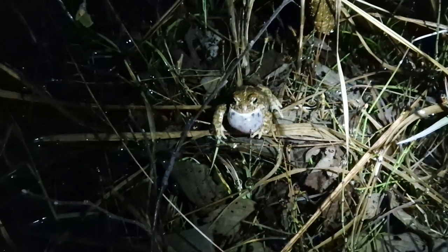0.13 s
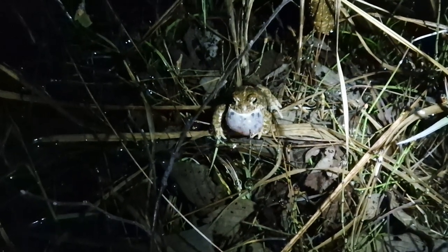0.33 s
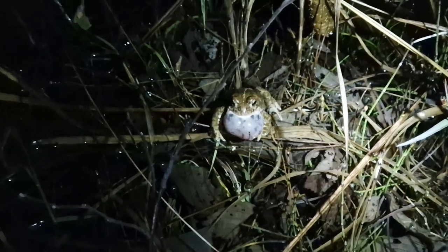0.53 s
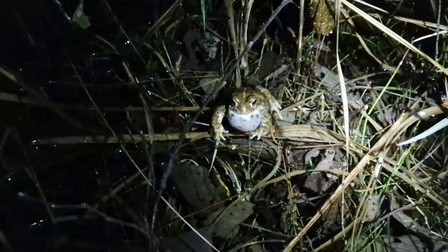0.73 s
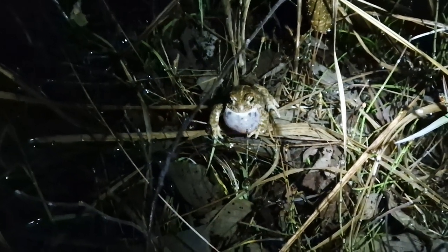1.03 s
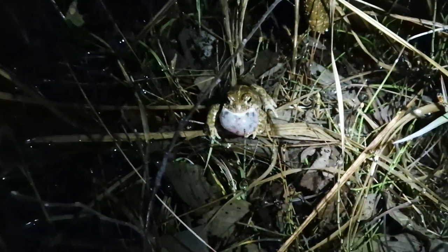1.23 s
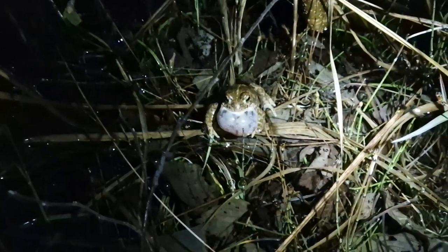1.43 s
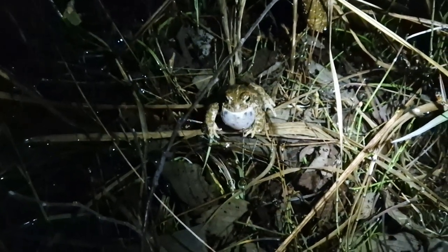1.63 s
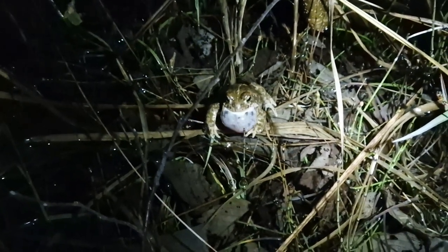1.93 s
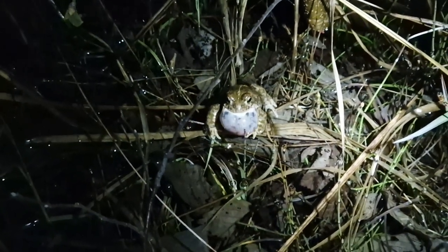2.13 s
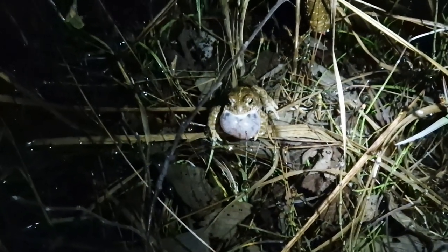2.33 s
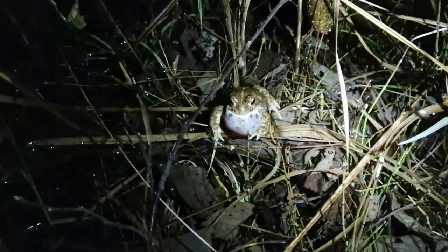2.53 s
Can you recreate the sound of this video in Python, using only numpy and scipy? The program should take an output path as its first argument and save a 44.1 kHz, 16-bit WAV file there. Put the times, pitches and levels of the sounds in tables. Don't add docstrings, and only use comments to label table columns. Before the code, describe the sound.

Loud rattling toad calls in three bursts, with a weaker neighbour and distant toad chorus

```python
import sys
import numpy as np
from scipy import signal
from scipy.fft import rfft, irfft, next_fast_len
from scipy.io import wavfile

SR = 44100
rng = np.random.default_rng(int(sys.argv[2]) if len(sys.argv) > 2 else 0)


def transcribe(u):
    v = np.clip(np.atleast_2d(u).T, -1, 1)
    q = np.round(v * 32767).astype(np.int16)
    wavfile.write(sys.argv[1], SR, q)


def convert_level_to_amplitude(level_db):
    exponent = np.asarray(level_db, float) / 20
    return 10 ** exponent


N = 119070


def decay(hz, t60_s):
    return 2j * np.pi * hz - np.log(1000) / t60_s


def pair(t, a, b):
    y = (np.exp(a * t) - np.exp(b * t)) / (a - b)
    return y / np.abs(y).max(axis=1, keepdims=True)


def onset(t, rise_s):
    return 1 - np.exp(-t / rise_s)


def filtered(x, order, hz, kind):
    return signal.sosfilt(signal.butter(order, hz, kind, fs=SR, output="sos"), x)


def place(times_s, way, shape, size=1500):
    left_db, right_db, late_ms = way
    out = np.zeros(next_fast_len(N + 4000))
    first = np.floor(times_s * SR).astype(int)
    i = np.arange(size)
    t = np.maximum((i + (first - times_s * SR)[:, None]) / SR, 0)
    fade = np.minimum((size - i) / 300, 1)
    np.add.at(out, first[:, None] + i, shape(t) * fade)
    hz = np.arange(len(out) // 2 + 1) * SR / len(out)
    late = np.exp(-2j * np.pi * hz * late_ms / 1000)
    right = irfft(rfft(out) * late, len(out))
    return np.array([convert_level_to_amplitude(left_db) * out[:N], convert_level_to_amplitude(right_db) * right[:N]])


STRIKE = rng.standard_normal((400, 14)).T


def overtones(t, hz, db, t60_s):
    total = 0
    for f, d, s, z in zip(hz, db, t60_s, STRIKE[:, :len(t), None]):
        total = total + convert_level_to_amplitude(d + 1.5 * z) * np.exp(decay(f, s) * t + 1j * z * f / 4000)
    return -total * onset(t, 0.0011) ** 2


# start_s, level_db
GUSTS = [(0, -76.5), (1.68, -77), (1.76, -61), (1.84, -70.5), (1.94, -62), (2.05, -68.5), (2.21, -48),
         (2.4, -62), (2.48, -77), (2.62, -61.5), (2.7, -71)]


def night():
    z = rng.standard_normal((4, N))
    side = np.array([[1], [-1]])
    rumble = filtered(z[0] + 0.3 * z[1] * side, 3, [28, 68], "bandpass")
    start_s, level_db = np.array(GUSTS).T
    gusts = convert_level_to_amplitude(np.interp(np.arange(N) / SR, start_s, level_db))
    hiss = signal.lfilter([1], [1, -.93], z[2:])
    both = rumble / rumble.std() * gusts + hiss / hiss.std() * convert_level_to_amplitude(-81)
    return both * convert_level_to_amplitude(1.5 * side)


def chorus():
    calls_per_s, level_db, centre_hz = 130, -55.5, 1601
    z = rng.random((int(calls_per_s * N / SR), 3))
    total = np.zeros((2, N))

    def ring(t, hz, t60_s):
        return pair(t, decay(hz, t60_s), decay(1.02 * hz, 0.8 * t60_s)).real

    for k, pan_db in enumerate((2.5, -2.5)):
        when, pitch, loud = z[k::2].T
        f = centre_hz * (1 + 0.24 * (pitch[:, None] - .5))
        db = level_db + 14 * (loud[:, None] - .5)

        def click(t):
            y = ring(t, f, 0.03)
            y = y + convert_level_to_amplitude(-22) * ring(t, 2.4 * f, .02)
            y = y + convert_level_to_amplitude(-23.5) * ring(t, 2.35 * f, 0.018)
            return convert_level_to_amplitude(db) * y

        total += place(when * N / SR, (pan_db, -pan_db, -pan_db / 12), click, size=900)
    return total


# pitch_hz (for a 1717 Hz voice), level_db, t60_s
FAR_BODY = [(1000, -54.5, 0.016), (2150, -24, 0.0065), (3050, -28.5, 0.022), (3590, -19.5, 0.02),
            (4044, -19, .009), (4860, -47, 0.038), (9000, -46, 0.018)]


def far_toad(clicks, hz, t60_s, way, spread, bright_db):
    start_s, level_db = np.array(clicks).T
    f = hz * (1 + spread * rng.standard_normal((len(start_s), 1)))
    body_hz, body_db, body_t60_s = np.array(FAR_BODY).T

    def click(t):
        y = pair(t, decay(f, t60_s), decay(1.007 * f, 0.0084)) * onset(t, 0.00049) ** 2
        y = y + overtones(t, body_hz * hz / 1717, body_db + bright_db, body_t60_s)
        return convert_level_to_amplitude(level_db)[:, None] * y.real

    return place(np.maximum(start_s - .0005, 0), way, click)


# start_s, level_db
DEEP = [(0.0, -36.5), (0.0248, -37), (0.0485, -34.5), (0.0614, -44), (0.0745, -34), (0.1002, -33.5),
        (0.1188, -49), (0.1245, -32.5), (0.3035, -31), (0.3413, -39), (0.383, -47), (0.408, -41.5),
        (0.4147, -31.5), (0.6097, -39), (0.6528, -39.5), (0.7882, -32.5), (0.8589, -34.5),
        (0.9994, -34.5), (1.0283, -35), (1.0527, -37), (1.0827, -35), (1.1691, -38), (1.2007, -34),
        (1.2634, -48), (1.2868, -37.5), (1.4155, -35.5), (1.469, -50.5), (1.6705, -34), (1.7156, -34),
             (1.766, -37.3), (1.7867, -34.5), (1.802, -34.5), (1.8556, -38), (1.9074, -34), (1.976, -47),
             (2.0152, -28.5), (2.0868, -32.5), (2.1311, -38), (2.2406, -45.5), (2.3544, -45), (2.4684, -32),
             (2.535, -41.5), (2.556, -37), (2.5936, -33.5), (2.6172, -34), (2.6458, -34)]


def deep_toad():
    clicks = np.array(DEEP)
    return far_toad(clicks, 1507.4, 0.032, (1, -1.7, -.05), spread=0.005, bright_db=-2)


# start_s, level_db
CALL_1 = [(0.1341, -6.5), (0.1503, -3.5), (0.1655, -5), (0.1822, -4), (0.2022, -5.0), (0.2333, -7),
          (0.2584, -4), (0.2822, -5), (0.3145, -5), (0.3484, -4), (0.3672, -3.5), (0.3894, -3),
          (0.4205, -5), (0.45, -2), (0.4676, -2), (0.4872, -3), (0.5126, -4.5), (0.5422, -3),
          (0.5638, -3.5), (0.5922, -4.5)]
CALL_2 = [(0.8919, -5.5), (0.9088, -5.5), (0.927, -5), (0.9489, -5.5), (0.984, -8), (1.015, -4.5),
          (1.0362, -5), (1.0638, -5), (1.1037, -5.5), (1.1288, -4), (1.155, -4.5), (1.1894, -6),
          (1.2231, -3.5), (1.2486, -3.5), (1.271, -3.5), (1.299, -4), (1.3274, -3.5), (1.3498, -3),
          (1.374, -4.0), (1.3988, -3), (1.4307, -5), (1.4554, -3.5), (1.488, -5)]
CALL_3 = [(1.8083, -5.5), (1.8248, -5), (1.8427, -5.5), (1.865, -6), (1.8968, -6), (1.9364, -4),
          (1.962, -4.5), (1.9891, -4), (2.0207, -6.5), (2.046, -3.5), (2.0674, -4.5), (2.0963, -4.9),
          (2.1432, -4.5), (2.1704, -4.3), (2.199, -3.5), (2.224, -3.5), (2.2546, -4.2), (2.2861, -4),
          (2.3151, -4), (2.3393, -2.5), (2.3649, -4.0), (2.3903, -3.5), (2.4197, -4), (2.4462, -4)]
# slack_hz, tight_hz, slack_db, tight_db, t60_s
BODY = [(516, 610, -42.5, -43, .015), (858, 860, -36, -36.5, .017), (1180, 1500, -37, -36, 0.004),
        (2090, 2250, -25.5, -27.5, 0.039), (2720, 2830, -37, -34.5, 0.018), (3190, 3420, -28, -23.5, .014),
        (3930, 3850, -37, -41.5, 0.026), (4770, 5250, -47, -34.5, 0.021), (6380, 6350, -29.5, -29, 0.012),
        (8700, 10000, -70.5, -57, 0.012), (11400, 9400, -63.5, -42, 0.015),
        (12900, 11450, -72.5, -47.5, 0.025), (16000, 15500, -89, -42, .02),
        (15300, 14350, -110, -43, 0.022)]


def near_toad():
    calls = [np.array(c) for c in (CALL_1, CALL_2, CALL_3)]
    start_s, level_db = np.vstack(calls).T
    into_call_s = np.concatenate([c[:, 0] - c[0, 0] for c in calls])[:, None]
    tight = np.clip(into_call_s / 0.62, 0, 1.2) ** 0.77

    def mix(slack, tense):
        return slack + (tense - slack) * tight

    sac = decay(mix(1645, 1870.6), mix(0.016, 0.024))
    throat = decay(mix(1675, 1670), 0.014)
    belly = decay(1514.6, .04)
    body_hz, body_db, body_t60_s = [], [], []
    for slack_hz, tight_hz, slack_db, tight_db, t60_s in BODY:
        full = 0.52 if slack_hz < 14000 else 1
        body_hz.append(mix(slack_hz, tight_hz))
        body_db.append(slack_db + (tight_db - slack_db) * np.minimum(tight / full, 1))
        body_t60_s.append(t60_s)

    def click(t):
        y = pair(t, sac, throat) + convert_level_to_amplitude(-22) * pair(t, belly, throat)
        y = y * onset(t, 0.00058)
        y = y + overtones(t, body_hz, body_db, body_t60_s)
        air = filtered(rng.standard_normal(t.shape), 4, (3150, 6730), "bandpass")
        air = air * convert_level_to_amplitude(-36.5 - 60 * t / 0.043) * onset(t, 0.0019)
        return convert_level_to_amplitude(level_db + 0.43)[:, None] * (y.real + air)

    return place(start_s - .0004, (0, -7.5, .1), click)


# start_s, level_db
NEIGHBOUR = [(0.2426, -25.4), (0.5553, -20.5), (0.6174, -26), (0.6604, -27.5), (0.695, -26.5),
             (0.7319, -26), (0.766, -26), (0.8163, -25), (0.8478, -25.5), (0.9335, -23), (0.96, -23.5),
             (1.008, -28.2), (1.4095, -31), (1.4812, -27.0), (1.5127, -27), (1.544, -26.5), (1.575, -26.5),
             (1.6104, -26), (1.6408, -25.5), (1.6905, -26), (1.7429, -26), (1.7762, -26.5), (2.4072, -28),
             (2.4324, -26), (2.4608, -28.5), (2.5503, -27), (2.5747, -27), (2.6039, -27), (2.6382, -27),
             (2.6843, -27.5)]


def neighbour_toad():
    return far_toad(NEIGHBOUR, 1717, 0.016, (5.08, -1, 0.45), spread=0.012, bright_db=2.5)


# start_s, level_db, pitch_hz, t60_s, left_over_right_db
TICKS = [
    (.7575, -20, 1750, 0.0033, 18),
    (2.5015, -14, 1606, 0.015, 16.5),
    (2.5075, -33.5, 1240, 0.013, 2),
    (2.504, -51.5, 6000, 0.02, 5),
    (2.502, -40, 3240, 0.0102, 11),
    (2.6, -41.5, 1000, 0.0097, 18),
]


def ticks():
    total = np.zeros((2, N))
    for start_s, level_db, hz, t60_s, pan_db in TICKS:
        def snap(t):
            ring = pair(t, decay(hz, t60_s), decay(1.1 * hz, 0.65 * t60_s)).real
            return convert_level_to_amplitude(level_db) * onset(t, 0.00024) ** 2 * ring

        total += place(np.array([start_s]), (0, -pan_db, .15), snap)
    return total


def reeds(voices):
    t60_s = 0.088
    t = np.arange(6000) / SR
    tail = rng.standard_normal((2, len(t))) * convert_level_to_amplitude(-60 * t / t60_s) * (t > .002)
    tail = tail / np.sqrt((tail ** 2).sum(axis=1, keepdims=True))
    stems = filtered(tail * convert_level_to_amplitude(-55 * t / t60_s), 5, 2280, "high")
    tail = convert_level_to_amplitude(-31.5) * tail + convert_level_to_amplitude(-10) * stems
    scattered = signal.fftconvolve(voices[:1], tail, axes=1)[:, :N]
    return scattered * convert_level_to_amplitude(np.array([[0], [-4]]))


def scene():
    voices = near_toad() + neighbour_toad() + deep_toad() + chorus() + ticks()
    return voices + reeds(voices) + night()


def roots(hz, width_hz):
    r = np.exp(-np.pi * width_hz / SR)
    return [1, -2 * r * np.cos(2 * np.pi * hz / SR), r * r]


def band_limit(x):
    return signal.sosfilt(signal.butter(12, 16480, fs=SR, output="sos"), x)


def record(dry):
    right = signal.lfilter(roots(1878.5, 210), roots(1682, 323), dry[1])
    ports = np.array([dry[0], right])
    notch = signal.iirnotch(2566, 2566 / 180, fs=SR)
    mix = signal.lfilter(*notch, ports)
    return band_limit(mix)


dry = scene()
out = record(dry)
transcribe(out)
```